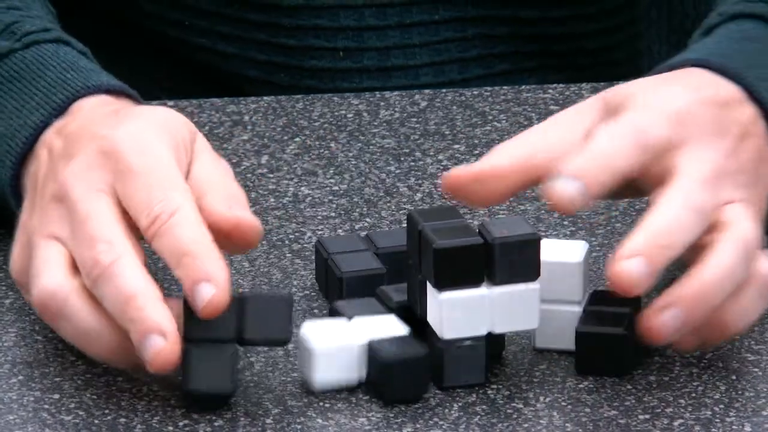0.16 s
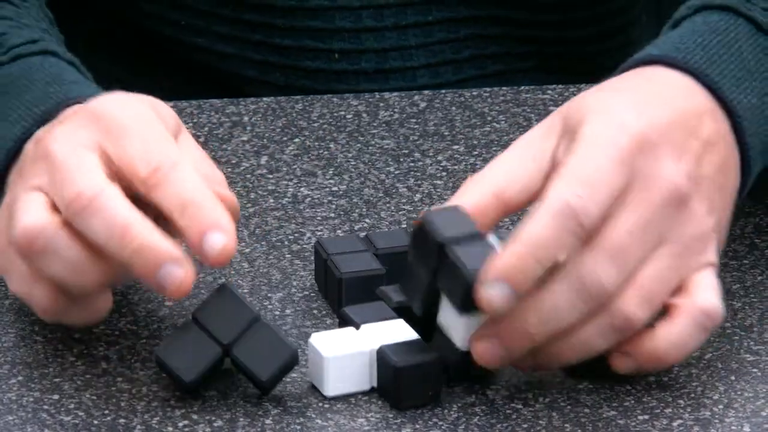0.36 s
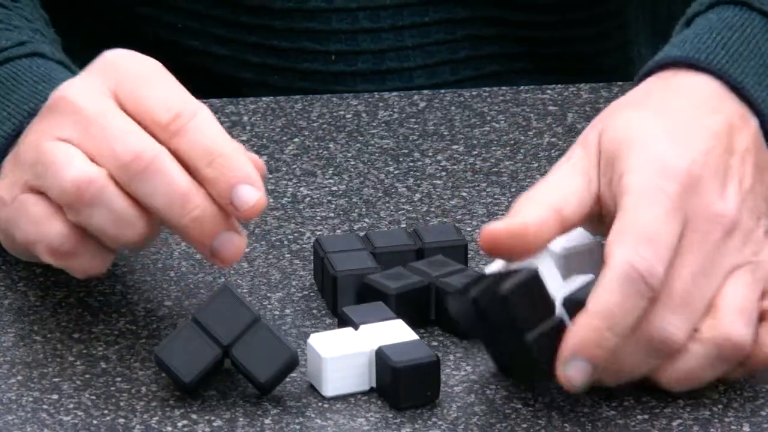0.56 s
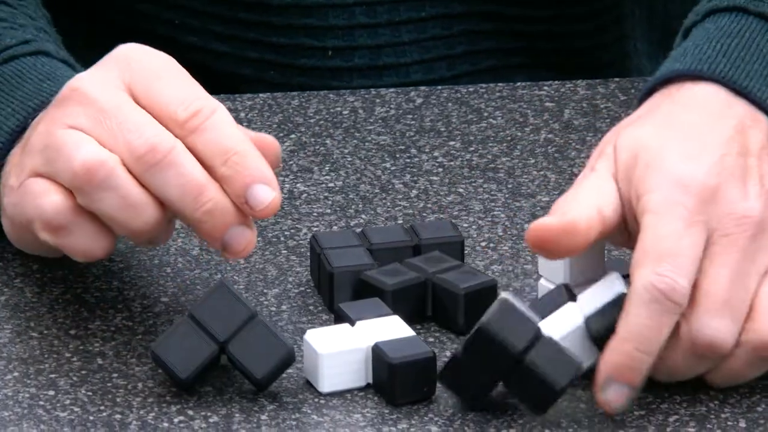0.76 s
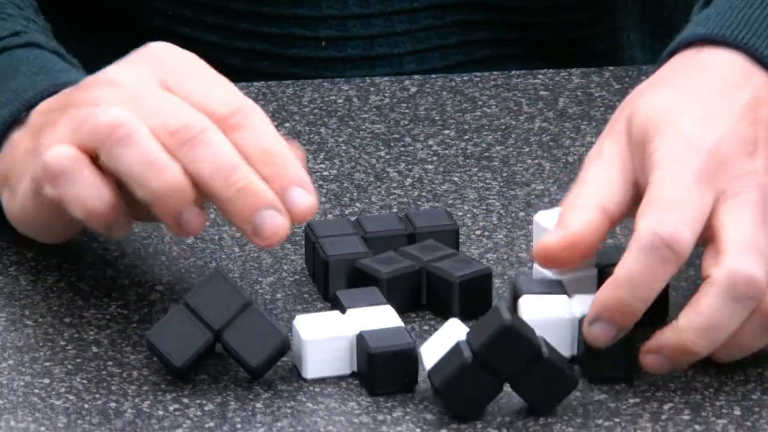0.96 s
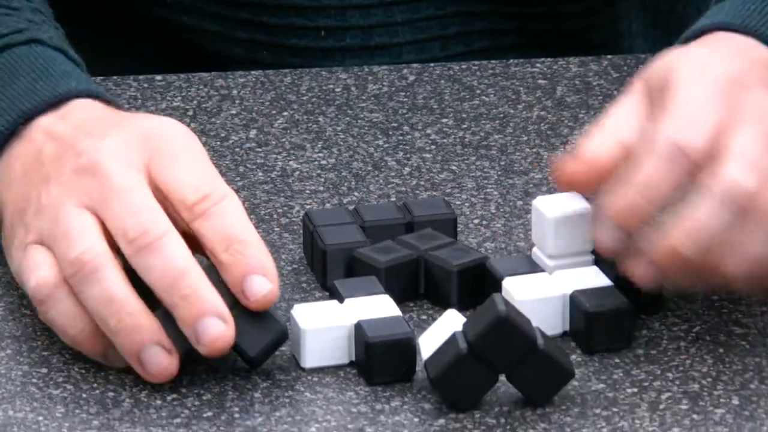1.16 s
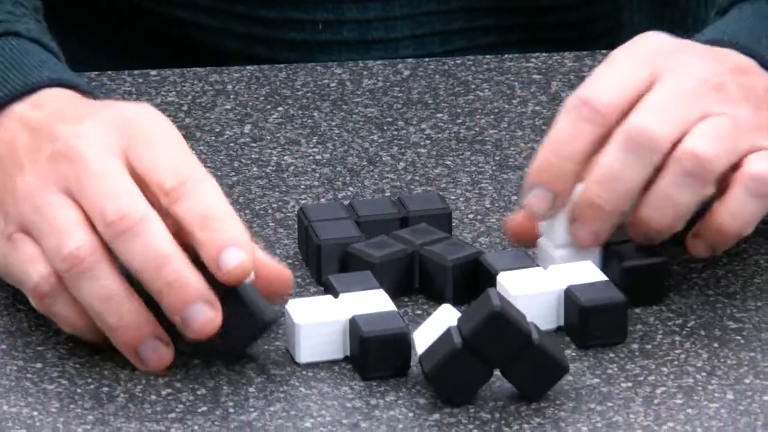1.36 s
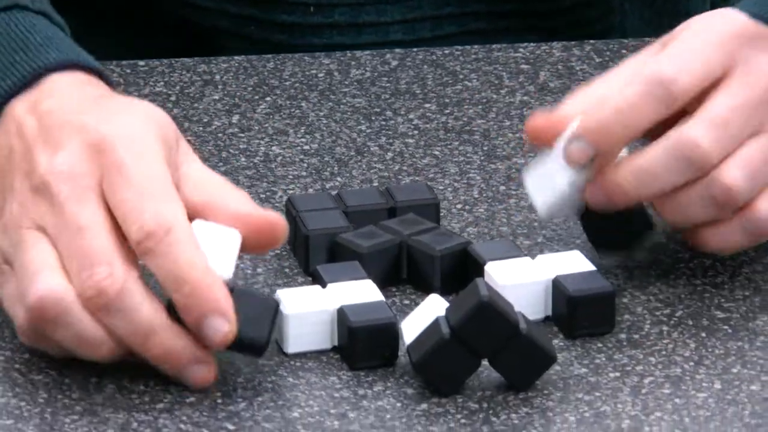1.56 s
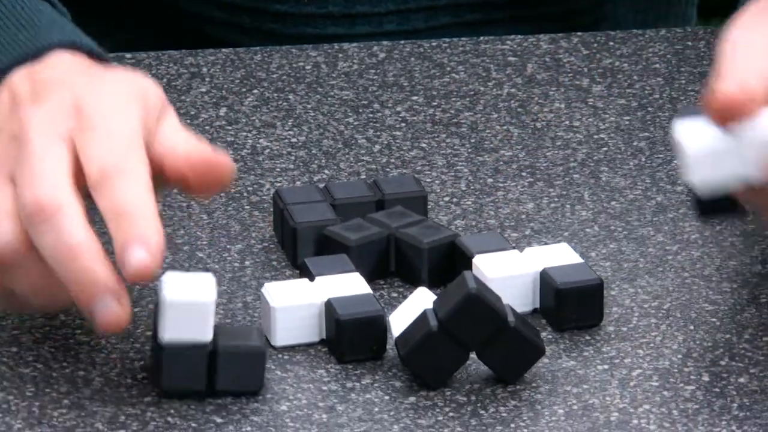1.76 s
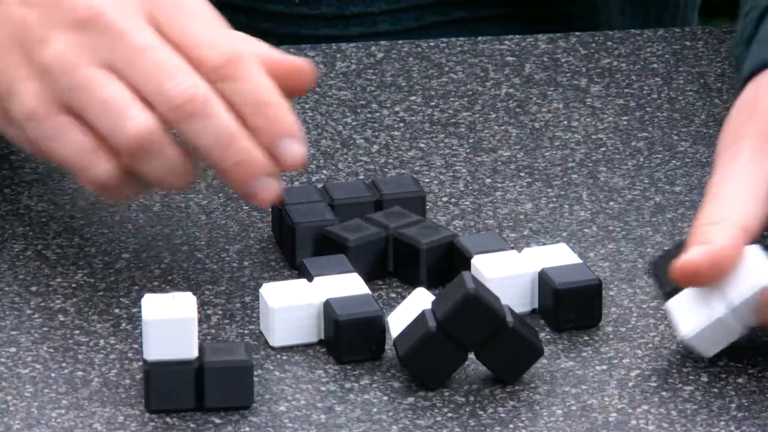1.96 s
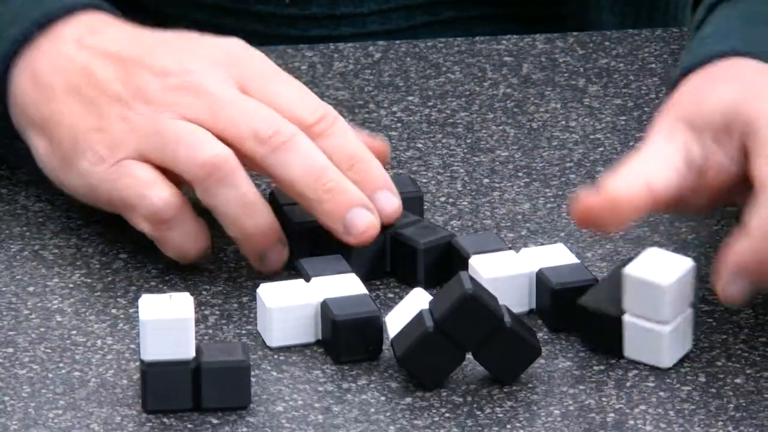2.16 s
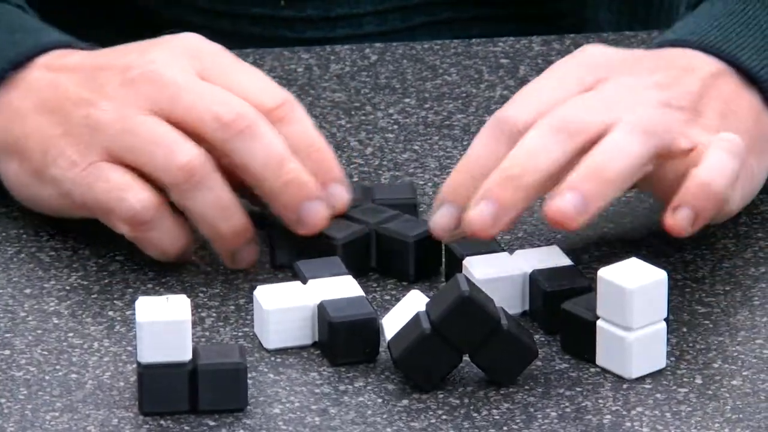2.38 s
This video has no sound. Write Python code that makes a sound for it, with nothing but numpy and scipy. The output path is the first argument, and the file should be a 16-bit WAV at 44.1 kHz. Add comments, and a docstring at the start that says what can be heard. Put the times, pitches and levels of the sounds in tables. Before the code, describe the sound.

Hard plastic puzzle pieces clatter rapidly and scrape on a tabletop, with hollow pings early on, a brief near-pause midway, then more knocks and short slides; close microphone in a small, quiet room.

```python
"""Hard plastic puzzle pieces knock and slide on a tabletop in a small room, close to a camera microphone.
Each knock is a short thud plus a sharp tick; dense small touches make the slide.
The struck pieces ring briefly, the table hums its modes, and some strokes keep one narrow mode singing.
The room throws knocks and rings back densely over a faint room tone; the recorder rounds off the peaks."""
import sys
import numpy as np
from scipy import signal
from scipy.fft import rfft, irfft
from scipy.io import wavfile

SR = 44100
rng = np.random.default_rng(int(sys.argv[2]) if len(sys.argv) > 2 else 0)


def gain_from_decibels(decibels):
    """Convert decibel values to linear amplitude factors."""
    exponent = np.asarray(decibels, float) / 20
    return 10 ** exponent


def store_wav(level_fs):
    """Save 16-bit WAV to argv[1]."""
    pcm = np.round(np.clip(np.atleast_2d(level_fs), -1, 1) * 32767)
    wavfile.write(sys.argv[1], SR, pcm.T.astype(np.int16))


N = 106766  # samples, about 2.4 s
UNLIKE = 0.06  # step by which pitches differ from piece to piece, as a fraction


def evened(x):
    """Scales to rms 1."""
    return x / np.sqrt(np.mean(x ** 2) + 1e-20)


def read(points, hz):
    """Looks a spectrum up on a log frequency axis."""
    f, value = np.transpose(points)
    return np.interp(np.log(hz + 1), np.log(f + 1), value)


def pulse(points):
    """The shortest causal (minimum-phase) pulse of a given colour, peak 1."""
    hz = abs(np.fft.fftfreq(4096, 1 / SR))
    log_gain = np.log(gain_from_decibels(np.maximum(read(points, hz), -90)))
    # the Hilbert transform of the log gain gives the phase
    spectrum = np.exp(np.conj(signal.hilbert(log_gain)))
    shape = np.fft.ifft(spectrum).real[:2048]
    return shape / abs(shape).max()


def train(times, sizes):
    """Clicks of given sizes at given times in seconds."""
    out = np.zeros(N)
    index = np.clip(np.round(times * SR).astype(int), 0, N - 1)
    np.add.at(out, index, sizes)
    return out


def ring(hz, db, t60):
    """One mode: a sine that swells quickly and dies by 60 dB in t60 seconds, cut at a quarter second."""
    swell_s = 0.0011  # time constant
    t = np.arange(SR // 4) / SR
    swell = 1 - np.exp(-t / swell_s)
    decay = gain_from_decibels(db - 60 * t / t60)
    return swell * decay * np.sin(2 * np.pi * hz * t)


def struck(s, size, modes, spread_db):
    """Every contact strikes another spot, so it wakes the modes in other shares."""
    shape = (len(s), len(modes))
    share = gain_from_decibels(spread_db * np.clip(rng.standard_normal(shape), -2, 1))
    spot = share * rng.choice([-1, 1], shape)
    out = np.zeros(N)
    for k, mode in enumerate(modes):
        out += signal.oaconvolve(train(s, size * spot[:, k]), ring(*mode))[:N]
    return out


def hush():
    """Faint steady room tone: noise coloured in the spectrum, then set to one rms level."""
    # colour of the room tone, relative: [hz, level_db per Hz]
    colour = [(40, -40), (150, -15), (600, -4.5), (2500, -12.5), (15800, -35)]
    level_db = -49  # rms
    z = rfft(rng.standard_normal(N)) * gain_from_decibels(read(colour, np.fft.rfftfreq(N, 1 / SR)))
    return gain_from_decibels(level_db) * evened(irfft(z, N))


def room(x):
    """Three tails of sparse echoes take turns; each band dies at its own speed."""
    # how fast the small room dies away: [hz, t60_s]
    decay = [(300, 0.39), (1500, 0.15), (4500, 0.089), (10000, 0.085)]
    # echo level against the direct sound: [hz, level_db]
    echo = [(1500, 2.5), (8000, 0.5)]
    first_echo_s, spacing = 0.002, 20  # spacing in samples, one echo at random in each
    taps = np.zeros((3, SR // 2))
    grid = np.arange(round(first_echo_s * SR), SR // 2 - spacing, spacing)
    at = grid + rng.integers(0, spacing, (3, len(grid)))
    np.put_along_axis(taps, at, rng.choice([-1., 1.], at.shape), 1)

    hz, t, z = signal.stft(taps, SR, nperseg=128)
    z = z * gain_from_decibels(-60 * t / read(decay, hz)[:, None])
    band_size = np.linalg.norm(z, axis=2).mean(0)[:, None]
    z = z / band_size * gain_from_decibels(read(echo, hz))[:, None]
    tail = signal.istft(z, SR, nperseg=128)[1] / 74  # energy 1 at 0 dB

    # the sound is shared among the tails in slow rotation, at constant total power
    phase = 7 * np.arange(N) / SR + np.arange(3)[:, None] / 3
    turn = np.cos(np.pi * phase) * np.sqrt(2 / 3)
    return signal.fftconvolve(x * turn, tail, axes=1)[:, :N].sum(0)


def tabletop(s, thud):
    """The thuds wake the modes of the table, which all hum for the same time."""
    # table modes, levels before the common offset: [hz, level_db]
    modes = [(490, -22), (730, -20), (856, -16), (999, -12), (1061, -7), (1330, -11), (1576, -13.5),
             (1724, -12.5), (2060, -17.5)]
    offset_db, t60_s = -8.5, 0.16
    return struck(s, thud, [(hz, offset_db + db, t60_s) for hz, db in modes], spread_db=5)


def rubs():
    """A dragged piece keeps one mode of table or piece singing: a tone plus narrow friction noise."""
    # strokes, rms level before the swell and fade: [start_s, length_s, level_db, pitch_hz]
    strokes = [(.68, .18, -28, 1570), (1.0, .12, -25, 1060), (1.0, .12, -26, 1575), (1.05, .13, -33, 3350),
               (1.41, .15, -29, 1347), (1.79, .05, -23, 1030), (2.05, .125, -43, 3000),
               (2.358, .06, -31, 2750)]
    width_hz = 25
    out, r = np.zeros(N), np.exp(-np.pi * width_hz / SR)
    for at, length, db, hz in strokes:
        t = np.arange(0, length, 1 / SR)
        noise = 1j * rng.standard_normal(SR // 2) + rng.standard_normal(SR // 2)
        wobble = signal.lfilter([1], [1, -r], noise)[-len(t):]
        steady = np.sqrt(np.mean(abs(wobble) ** 2))
        tone = evened(((steady + wobble) * np.exp(2j * np.pi * hz * t)).real)
        stroke = np.sqrt(np.sin(np.pi * t / length))  # swells and fades
        out[round(at * SR):][:len(t)] += gain_from_decibels(db) * stroke * tone
    return out


def pieces(s, thud, tick):
    """The pings, and the high modes, which sound more the harder the contact."""
    # high modes of the plastic, woken by the ticks: [pitch_hz, level_db, t60_s]
    plastic = [(3897, -10.5, 0.013), (6490, -18.5, 0.01), (7580, -17, 0.0089), (9010, -17.5, 0.0076),
               (10160, -21, 0.0047)]
    # knocks that make a hollow piece ping: [start_s, level_db, pitch_hz]
    pings = [(0.111, -13, 2980), (0.243, -16, 4440), (0.287, -11, 4030), (.306, -15, 3870),
             (0.372, -11.5, 4050), (0.41, -13, 4065), (2.05, -24, 2900), (2.179, -11, 2988),
             (2.25, -11.5, 2990), (2.3, -13.5, 2950), (2.227, -18, 2900), (.678, -20, 3100)]
    hardness, ping_t60_s = 0.89, 0.045  # hardness: exponent on the tick-to-thud ratio
    modes = [(hz * (1 + UNLIKE * piece), db, t60) for hz, db, t60 in plastic for piece in (-1, 0, 1)]
    out = struck(s, tick * abs(tick / thud) ** hardness, modes, spread_db=7.0)
    for at, db, hz in pings:
        part = out[round(at * SR):][:SR // 4]
        part += ring(hz, db, ping_t60_s)[:len(part)]
    return out


def touchdowns():
    """Times, thud sizes and tick sizes of the knocks; each piece touches down twice more, at random."""
    # knocks, levels before the offsets: [start_s, thud_db, tick_db re thud]
    hits = [(0.001, -8.5, -9), (0.041, -1.5, -11), (0.07, -6, -14.5), (0.112, -0.5, -11),
            (0.141, -1.5, -15), (0.176, -1.5, -18.5), (0.209, -12, -2.5), (0.242, -5.5, -19),
            (0.285, -4, -8.5), (0.305, -3, -16), (0.336, -1.5, -13.5), (0.37, -11.5, -5.5),
            (0.408, -11, -6.5), (0.422, -3, -19.5), (0.592, -9.5, -29), (0.677, 0.5, -21), (0.715, -3, -21),
            (0.761, -3, -19), (0.816, -2.5, -23), (0.833, -5.5, -11.5), (0.883, -0.5, -22),
            (0.921, -4, -14.5), (0.947, -7.5, -4.5), (0.968, -2.5, -11), (1.015, -1.5, -14),
            (1.029, -3, -22), (1.065, -8, -13), (1.099, -4, -14.5), (1.272, -21, -38), (1.322, -10, -38),
            (1.368, -8.5, -22), (1.385, -5, -21), (1.479, -19.5, -16), (1.564, -5, -54), (1.712, -5, -23.5),
            (1.737, -16, -23), (1.769, 0.5, -10), (1.789, -7.5, -15), (1.833, -2.5, -11), (1.879, -2, -16),
            (1.919, -2.5, -14.5), (1.942, -5, -14), (1.978, -0.5, -21), (2.051, -2.5, -25.5),
            (2.06, -3.5, -28), (2.179, 0, -17), (2.227, -3.5, -20), (2.253, -3.5, -12.5),
            (2.296, -10.5, -13), (2.307, -14.5, -7.5), (2.36, -5, -16)]
    thud_offset_db, tick_offset_db = -3.5, 8.5
    lag_s = 0.001  # added to every listed start
    bounce_s, bounce_db = 0.009, -5  # range of the random delay; largest bounce against its knock
    s, db, tick_db = np.transpose(hits)
    delay_luck, size_luck, tick_luck = rng.random((3, 2, len(s)))
    bounce_at = s + bounce_s * (0.15 + delay_luck)
    thud = gain_from_decibels(thud_offset_db + db)
    bounce = thud * gain_from_decibels(bounce_db) * (2 * size_luck - 1)
    crispness = gain_from_decibels(tick_offset_db + tick_db)
    bounce_tick = bounce * crispness * 2 * tick_luck
    times = np.r_[s, bounce_at.ravel()] + lag_s
    return times, np.r_[thud, bounce.ravel()], np.r_[thud * crispness, bounce_tick.ravel()]


def sliding():
    """Times, thud sizes and tick sizes of the many small random touches of dragged, jostled pieces."""
    # course of the slide, level before the offset: [time_s, level_db, tick_db re thud]
    course = [(0, -18, -2.5), (0.438, -16, -7), (.5, -17.5, -10.5), (.66, -19, -14), (1.0, -16, -7.5),
              (1.16, -16, -9), (1.21, -44, -6), (1.26, -68, -27), (1.3, -20, -28), (1.36, -39, -25),
              (1.4, -26, -11), (1.629, -21.5, -10.5), (1.66, -52, 6), (1.705, -46, -13),
              (1.754, -21.5, -9.5), (1.99, -24, -9.5), (2.088, -19, -14.5), (2.13, -45, -45),
              (2.199, -23.5, -9), (2.332, -15, -9.5), (2.42, -36.5, -3.5)]
    offset_db, grains_per_s, spread_db = -6, 1100, 5
    at = np.flatnonzero(rng.random(N) < grains_per_s / SR) / SR
    sizes = evened(gain_from_decibels(spread_db * np.minimum(rng.exponential(1, len(at)), 4)))
    when, slide_db, crisp_db = np.transpose(course)
    small = sizes * rng.choice([-1, 1], len(at)) * gain_from_decibels(offset_db + np.interp(at, when, slide_db))
    return at, small, small * gain_from_decibels(np.interp(at, when, crisp_db))


def contacts():
    """All touches of plastic on the table: knocks with their bounces, then the sliding grains."""
    return [np.concatenate(pair) for pair in zip(touchdowns(), sliding())]


def knocks(s, thud, tick):
    """Thud and tick of every contact; three sizes of piece sound lower or higher."""
    # colour of the thud, relative: [hz, level_db per Hz]
    thud_colour = [(60, -59.5), (200, -31.5), (480, -11), (900, -4.5), (1050, -3), (1700, -6), (3000, -22),
                   (5000, -34), (9000, -90.5)]
    # colour of the tick, relative: [hz, level_db per Hz]
    tick_colour = [(1200, -42), (2500, -3), (4200, -10), (5500, -22.5), (15500, -53)]
    piece = rng.integers(-1, 2, len(s))
    out = np.zeros(N)
    for k in (-1, 0, 1):
        for size, colour in ((thud, thud_colour), (tick, tick_colour)):
            shifted = [(hz * (1 + 2 * UNLIKE * k), db) for hz, db in colour]
            out += signal.oaconvolve(train(s, size * (piece == k)), pulse(shifted))[:N]
    return out


def scene():
    """Knocks, rubs, ringing pieces, table, the echoes, and the room tone."""
    s, thud, tick = contacts()
    near, rings = knocks(s, thud, tick), pieces(s, thud, tick)
    # the small rings reach the walls more weakly than the knocks
    echoes = room(near + gain_from_decibels(-8) * rings)
    mix = near + rings + tabletop(s, thud) + echoes + rubs() + hush()
    return mix[None]


def top_cut(x):
    """Nothing passes above the cut-off."""
    return signal.sosfilt(signal.butter(12, 15820, fs=SR, output="sos"), x)


def record(dry):
    """The recorder rounds off the peaks below a ceiling."""
    ceiling, knee = 0.73, 8  # full scale is 1; a higher knee bends later and harder
    soft = dry / (1 + abs(dry / ceiling) ** knee) ** (1 / knee)
    return top_cut(soft)


dry = scene()
out = record(dry)
store_wav(out)
```